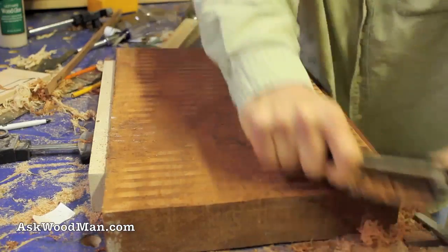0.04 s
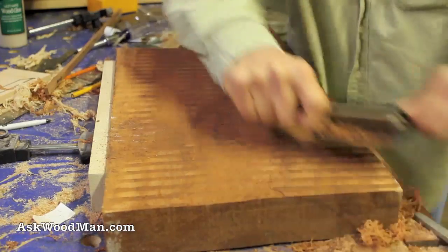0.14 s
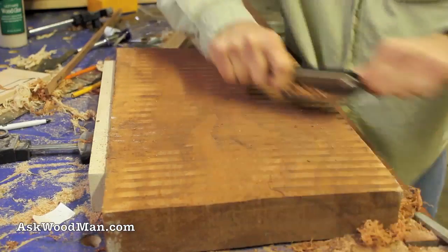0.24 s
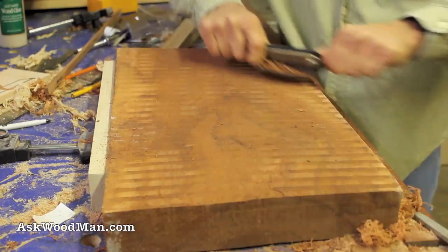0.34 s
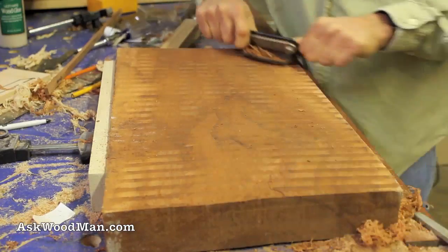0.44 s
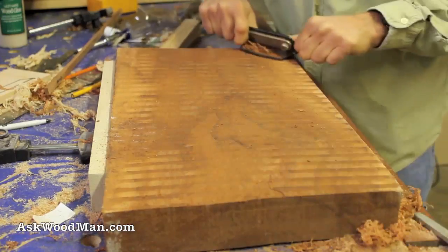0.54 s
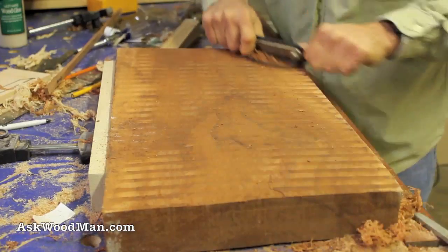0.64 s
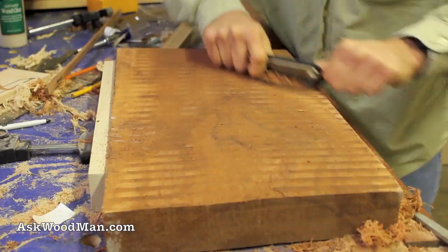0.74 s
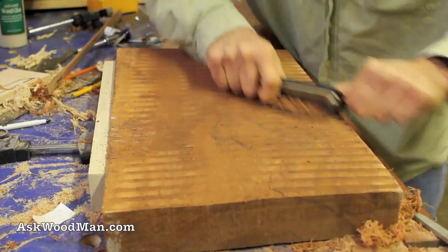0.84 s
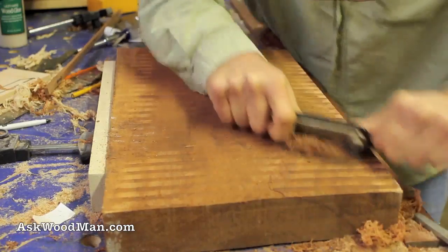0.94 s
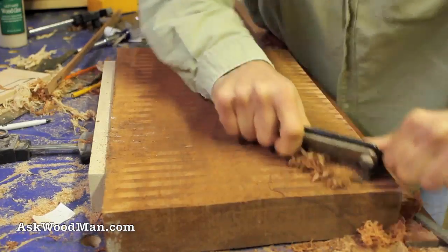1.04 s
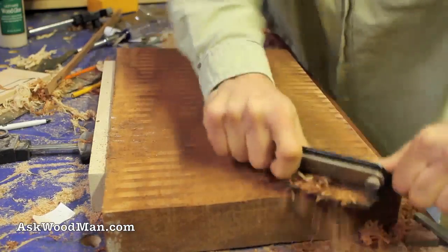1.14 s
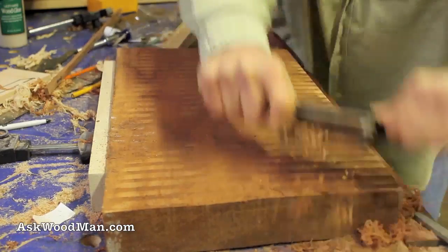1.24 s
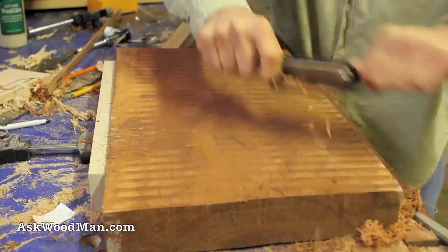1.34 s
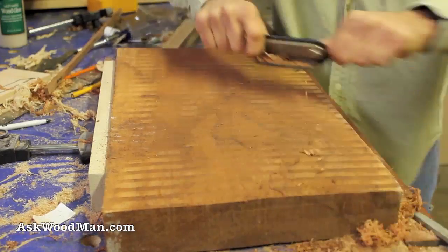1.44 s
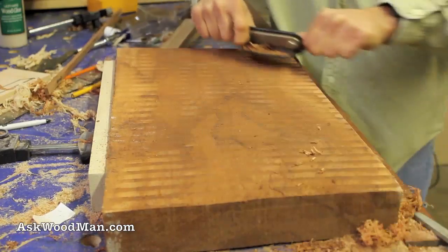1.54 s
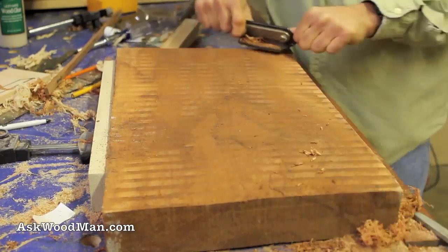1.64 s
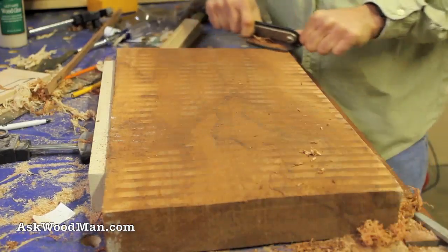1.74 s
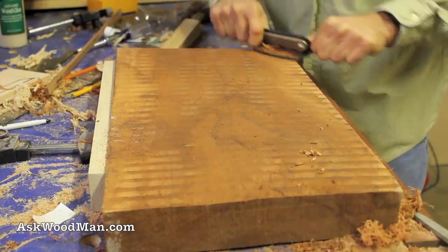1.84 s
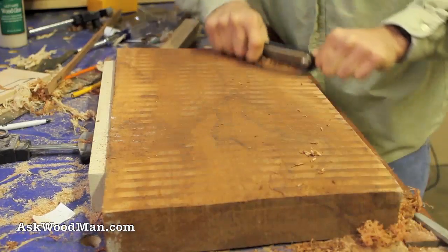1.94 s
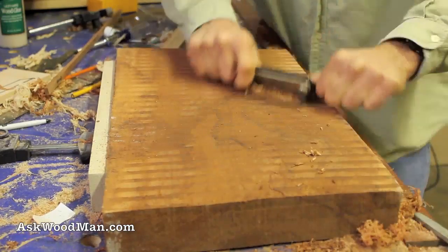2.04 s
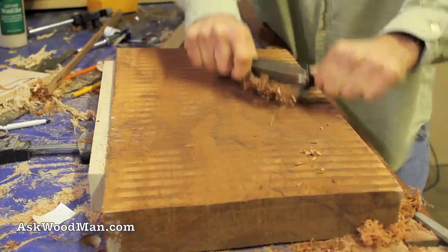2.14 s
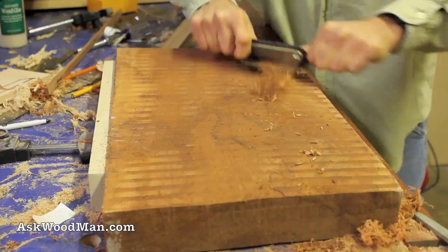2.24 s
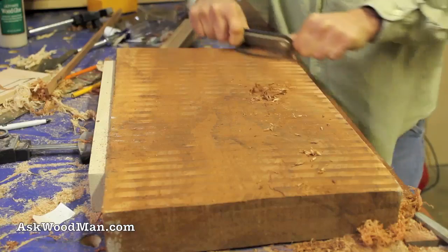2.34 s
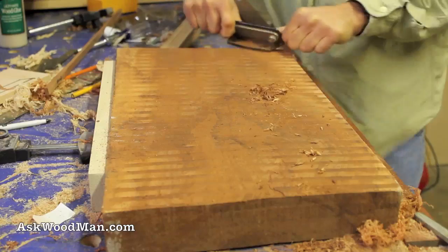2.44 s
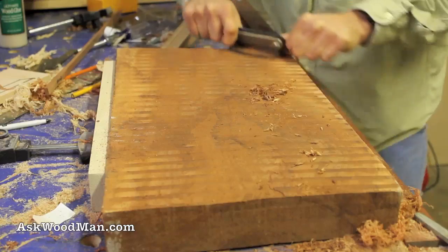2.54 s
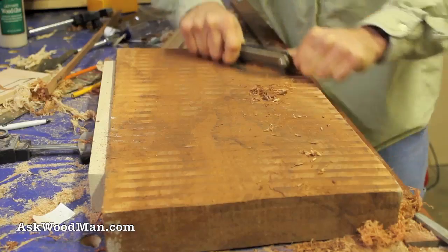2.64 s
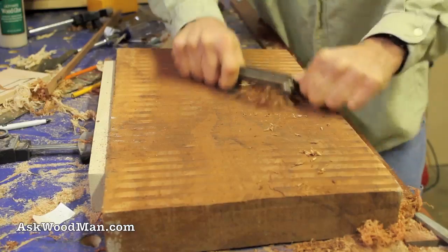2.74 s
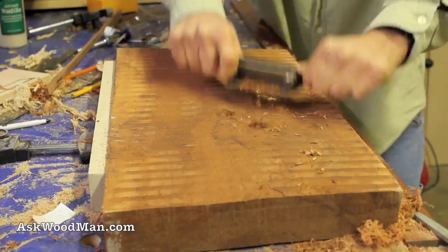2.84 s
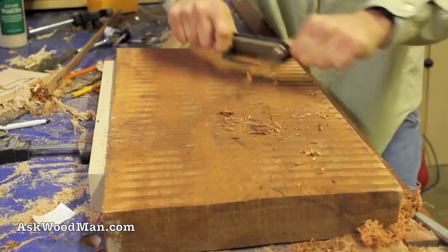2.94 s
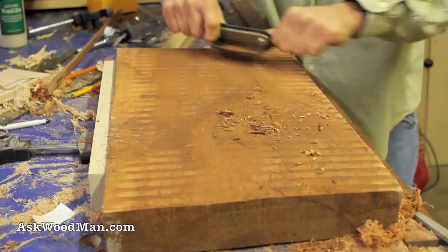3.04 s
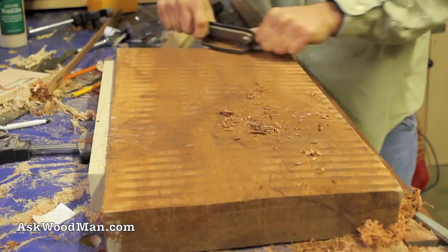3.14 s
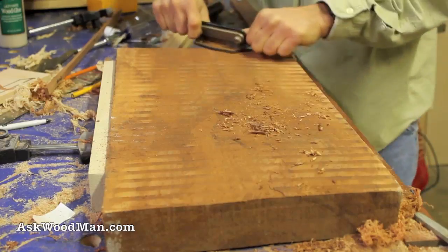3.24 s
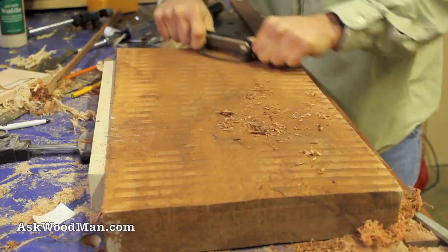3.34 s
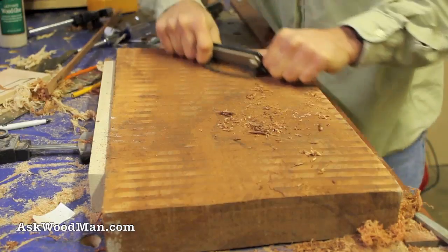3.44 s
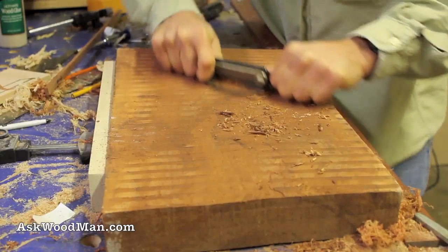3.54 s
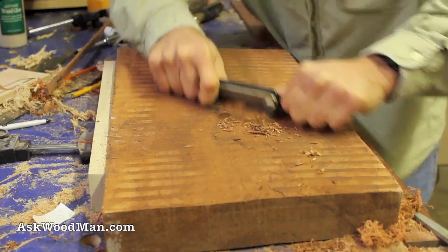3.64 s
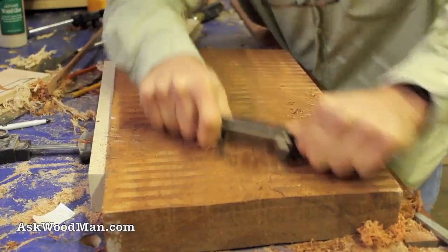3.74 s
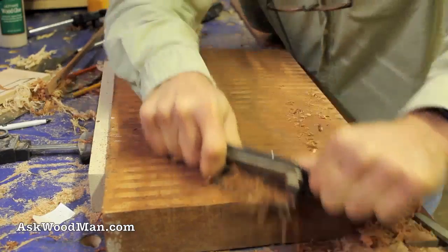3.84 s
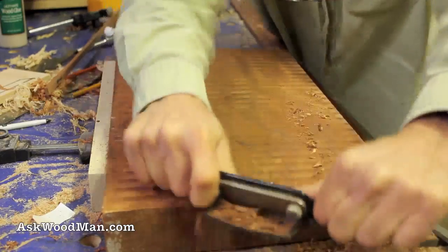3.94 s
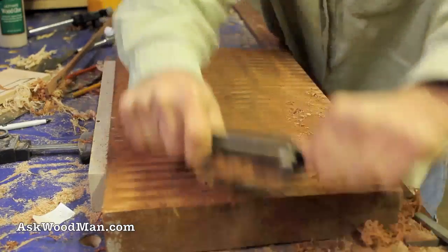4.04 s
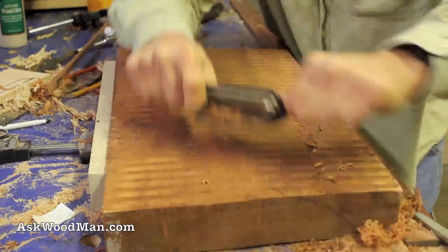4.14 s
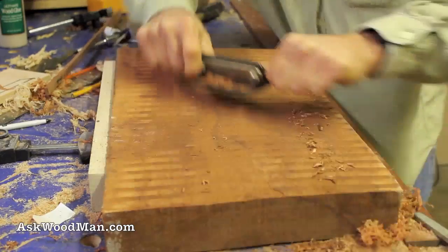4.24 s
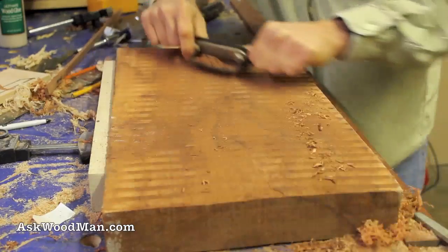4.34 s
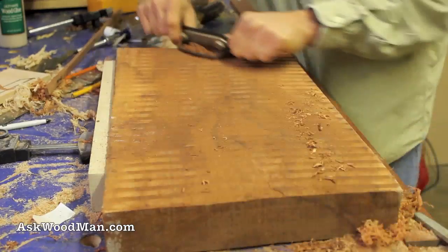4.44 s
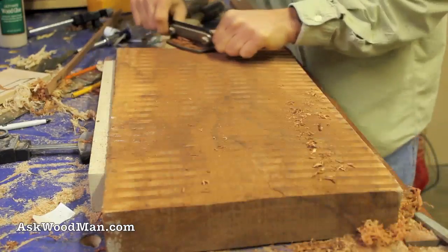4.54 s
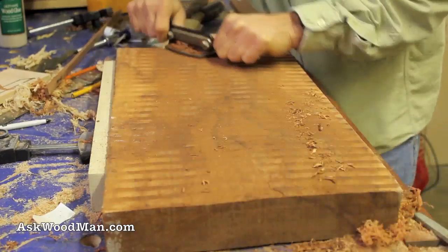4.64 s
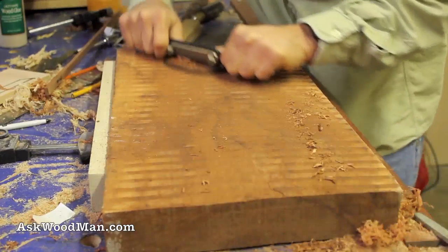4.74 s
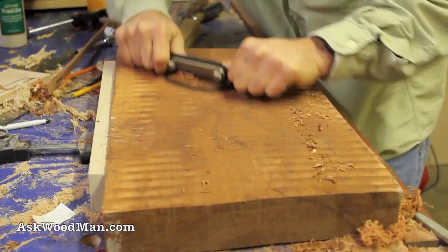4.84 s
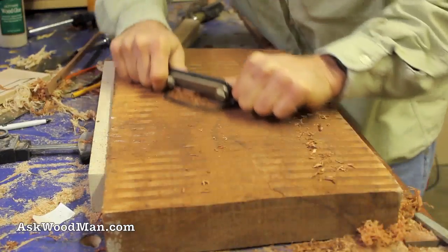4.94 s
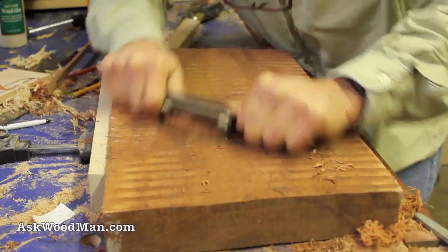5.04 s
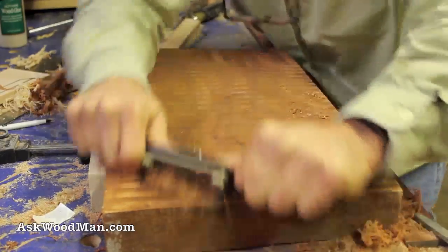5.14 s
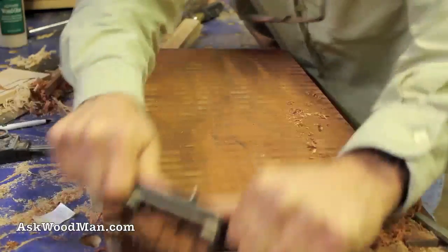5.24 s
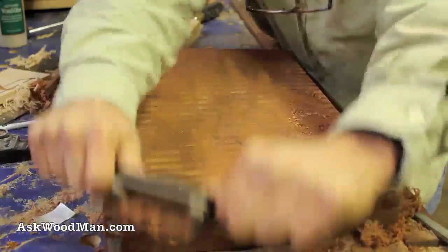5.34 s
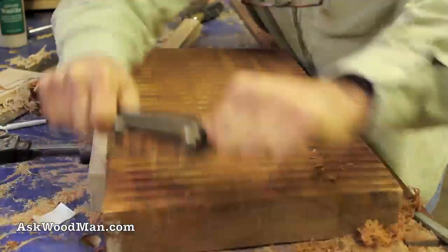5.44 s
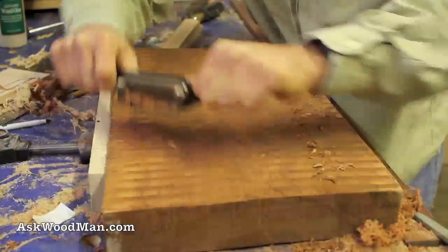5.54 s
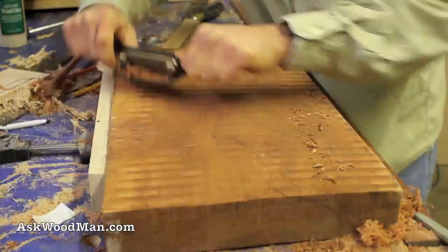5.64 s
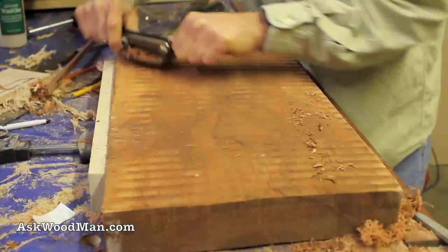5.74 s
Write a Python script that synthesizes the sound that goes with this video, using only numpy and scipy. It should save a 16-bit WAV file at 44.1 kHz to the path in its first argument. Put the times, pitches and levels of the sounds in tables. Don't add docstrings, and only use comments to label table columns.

```python
import sys
import numpy as np
from scipy import signal
from scipy.fft import rfft, irfft, next_fast_len
from scipy.io import wavfile
from scipy.ndimage import uniform_filter1d, map_coordinates

SR = 44100
rng = np.random.default_rng(int(sys.argv[2]) if len(sys.argv) > 2 else 0)


def boost(x):
    u = np.asarray(x, float) / 20
    return 10 ** u


def to_wav(s):
    ch = np.atleast_2d(s).T
    pcm = np.round(np.clip(ch, -1, 1) * 32767)
    wavfile.write(sys.argv[1], SR, pcm.astype(np.int16))


N = 255691
LEAD = SR // 2
KNEE_DB = -19

# blade [dB], edge hiss and dust hiss [dB re blade], slab [dB].
BEFORE_DB = (-20, -6, -15, -27.5)
# time [s], cutting force [dB], chatter [Hz].
PULL_1 = [
    [(.565, -47, 3230), (.608, -33.5, 3150), (.638, -15.5, 3110), (.752, -13, 3300), (.78, -17, 3500),
     (.888, -12, 3500), (.979, -20, 3100), (1.015, -34, 3110), (1.047, -26, 3130)],
    [(1.048, -27, 3174), (1.06, -19.5, 3160), (1.09, -14, 3270), (1.129, -15, 3400)],
]
PULL_2 = [
    [(1.803, -29, 3104), (1.812, -26.5, 3150), (1.843, -21, 3300), (1.861, -12.5, 3250), (1.929, -17, 3250),
     (1.971, -13.5, 3500), (2.069, -16.5, 3480), (2.075, -28, 3630)],
]
PULL_3 = [
    [(2.503, -44, 3460), (2.516, -27.5, 3440), (2.543, -14, 3300), (2.565, -12.5, 3224), (2.713, -19, 3280),
     (2.757, -12.5, 3394), (2.775, -30, 3280)],
]
PULL_4 = [
    [(3.289, -29, 3410), (3.31, -19.5, 3213), (3.34, -13, 3132), (3.472, -22.5, 2992)],
    [(3.473, -14, 3380), (3.49, -15.5, 3203), (3.623, -15, 3400), (3.657, -20.5, 3156),
     (3.719, -13.5, 3330), (3.819, -25, 3160), (3.877, -16.5, 3200), (3.922, -24.5, 3334)],
]
PULL_5 = [
    [(4.532, -47.5, 3252), (4.605, -37.5, 3213), (4.647, -25, 3100), (4.682, -12.5, 3413),
     (4.748, -15.5, 3140), (4.802, -19, 3430), (4.862, -16.5, 3126), (5.0, -18.5, 3050), (5.038, -14, 3263)],
    [(5.05, -39, 3260), (5.09, -34, 3197), (5.101, -40, 3107), (5.107, -15.5, 3154), (5.167, -22, 3464),
     (5.251, -21.5, 3600), (5.262, -27, 3634)],
]
PULLS = [PULL_1, PULL_2, PULL_3, PULL_4, PULL_5]
# edge hiss and dust hiss [dB re force], slab boom [dB],
# slab ring [dB], dust fading [dB per s].
WOOD = [
    (-3.5, -11, -65, -48.5, -10),
    (-2, -8, -39.5, -36, -20),
    (-1.5, -8, -38.5, -37, -6),
    (-4, -9.5, -33, -35.5, -11),
    (-3.5, -9, -40.5, -35, 1),
]
# time [s], peak [dB], pitch [Hz].
CATCHES = [(0.6492, -17, 3350), (0.67, -11, 3380), (0.699, -10, 3320), (0.7158, -13, 3290),
           (0.7441, -6, 3400), (0.753, -9, 3620), (0.7761, -11, 3400), (0.8646, -13, 3470),
           (0.8844, -8, 3580), (0.912, -11, 3480), (0.9227, -7, 3270), (0.9684, -11.5, 3150),
           (1.0042, -19, 3070), (1.065, -9.5, 3250), (1.0954, -4, 3100), (1.1162, -4, 3450),
           (1.1253, -14, 3550), (1.8534, -8, 3360), (1.8766, -5, 3250), (1.891, -9, 3350),
           (1.908, -6.5, 3290), (1.9829, -12, 3440), (2.004, -6, 3720), (2.039, -12, 3350),
           (2.064, -14, 3430), (2.5614, -9, 3400), (2.5981, -15, 3340), (2.6297, -10, 3110),
           (2.7444, -18, 3440), (2.7595, -10, 3290), (3.3116, -14, 3240), (3.3234, -10, 3160),
           (3.3473, -8, 3100), (3.363, -4, 3380), (3.3721, -6, 3110), (3.402, -8, 3130), (3.4886, -9, 3240),
           (3.5114, -12, 3070), (3.565, -10, 3230), (3.6031, -7, 3060), (3.626, -10, 3420),
           (3.697, -7, 3540), (3.7106, -8.5, 3800), (3.7228, -8, 3490), (3.7439, -7.5, 3010),
           (4.6548, -16, 3210), (4.6773, -7, 3580), (4.687, -8, 3310), (4.7058, -8, 3500),
           (4.7272, -9, 2800), (4.7534, -10, 3230), (4.7686, -11, 3300), (4.8311, -9, 3660),
           (4.8686, -8, 3420), (4.9835, -12, 2880), (5.0082, -12, 3370), (5.0341, -9, 3290),
           (5.109, -4.5, 3090), (5.1329, -9, 3600), (5.2337, -12.5, 3680)]


def unit(x):
    return x / np.sqrt(np.mean(x ** 2) + 1e-20)


def along(points, hz):
    f, v = np.transpose(points)
    return np.interp(np.log(hz + 1), np.log(f + 1), v)


def curves(spans, silent):
    t = np.arange(N) / SR
    s, *cols = np.transpose(np.vstack(spans))
    on = sum((t >= rows[0][0] - .001) & (t <= rows[-1][0] + .001) for rows in spans) > 0
    return [np.where(on | (k >= silent), np.interp(t, s, c), -120) for k, c in enumerate(cols)]


def swells(rows):
    s, half, *cols = np.transpose(rows)
    bells = np.exp(-((np.arange(N) / SR - s[:, None]) / half[:, None]) ** 2)
    return [boost(c) @ bells for c in cols]


def per_pull(values):
    starts = [pull[0][0][0] for pull in PULLS[1:]]
    return np.asarray(values)[np.searchsorted(starts, np.arange(N) / SR)]


def pull_times():
    return per_pull([(pull[0][0][0], pull[-1][-1][0]) for pull in PULLS]).T


def earlier(curve, value):
    return np.r_[np.full(LEAD - 900, value), np.full(900, -120), curve]


def wobble(rate, size):
    return map_coordinates(rng.standard_normal(int(size * rate / SR) + 4), [np.arange(size) * rate / SR])


def filtered(x, response):
    m = 2 * next_fast_len(len(x) // 2 + 4096)
    return irfft(rfft(x, m) * response(np.fft.rfftfreq(m, 1 / SR)), m)[:len(x)]


def coloured(x, spectrum):
    return unit(filtered(x, lambda hz: boost(along(spectrum, hz))))


def struck(x, spectrum):
    def response(hz):
        cepstrum = irfft(np.log(boost(along(spectrum, hz)) + 1e-4))
        half = len(cepstrum) // 2
        cepstrum[1:half] *= 2
        cepstrum[half + 1:] = 0
        return np.exp(rfft(cepstrum, len(cepstrum)))
    return unit(filtered(x, response))


def patchy(x, depth_db):
    z = signal.stft(x, nperseg=256)[2]
    field = uniform_filter1d(rng.standard_normal(z.shape), size=4, axis=0)
    field = uniform_filter1d(field, size=12, axis=1)
    return signal.istft(z * boost(depth_db * unit(field)), nperseg=256)[1][:len(x)]


def resonant(x, modes, shift_db, rate, lean=0):
    out = 0
    for hz, width_hz, db in modes:
        def twice(f):
            damping = 1j * f * width_hz * 1.5
            return (damping / (hz * hz - f * f + damping)) ** 2
        gain_db = db + shift_db * wobble(rate, len(x)) + lean * (hz - 3250) / 1000
        out = out + boost(gain_db) * unit(filtered(x, twice))
    return out / np.sqrt(np.abs(uniform_filter1d(out ** 2, size=5000)) + 1e-9)


def dying(decays, stretch, size):
    hz, t, z = signal.stft(rng.standard_normal(size), SR, nperseg=256)
    fade_db = -60 * t / (stretch * along(decays, hz))[:, None]
    tail = signal.istft(z * boost(fade_db), SR, nperseg=256)[1][:size]
    return tail / np.linalg.norm(tail)


def ring(modes, t, stretch):
    out = 0
    for hz, db, t60_s in modes:
        decay = boost(db + rng.normal(0, .5) - 60 * t / (stretch * t60_s))
        out = out + decay * np.sin(2 * np.pi * hz * (1 + rng.normal(0, .003)) * t)
    return out


def fibres(size, lump_db, spike_db):
    return rng.standard_normal(size) * boost(lump_db * wobble(300, size) + spike_db * wobble(2500, size))


def tones(lines, unsteady_db):
    t = np.arange(N) / SR
    out = 0
    for hz, db in lines:
        level = boost(db + 4.5 + unsteady_db * wobble(5.37, N))
        out = out + level * np.sin(2 * np.pi * (hz * t + rng.random()))
    return out


def gain_control():
    low_db, start_db, back_db_per_s = -70.5, -75.5, 12.5
    t = np.arange(N) / SR
    start, end = pull_times()
    before_db = start_db + 2 * back_db_per_s * t
    after_db = low_db + back_db_per_s * np.maximum(t - end, 0)
    return uniform_filter1d(np.where(t < start, before_db, after_db), size=4000)


def air_and_lamps(gain_db):
    # frequency [Hz], density [dB per Hz].
    air_spectrum = [(15, -44), (25, -11), (190, -1.5), (236, -2), (285, -16), (354, 0), (1100, -10),
                    (1190, -16), (1400, -3), (2350, -8.5), (2690, -8.5), (14400, -19), (16000, -14.5)]
    # frequency [Hz], level [dB rms].
    lamp_lines = [(120, -71.5), (240, -63), (360, -63), (480, -66.5), (720, -71.5), (960, -73), (1080, -77),
                  (1200, -63.5), (1920, -72), (2040, -69.5), (2160, -73), (2280, -65.5), (2400, -73)]
    hush = boost(-53.0) * coloured(rng.standard_normal(N), air_spectrum)
    return boost(0.42 * (gain_db + 59.5)) * (hush + tones(lamp_lines, unsteady_db=5.5))


def whine(gain_db):
    # frequency [Hz], level [dB re whine].
    whine_lines = [(15674, -2), (15694, -15), (15734, 8.5), (15778, -14)]
    beat_hz, beat_depth = 13, .6
    beat = 1 - beat_depth * np.cos(2 * np.pi * beat_hz * np.arange(N) / SR)
    return beat * boost(gain_db + .8 * wobble(25, N)) * tones(whine_lines, unsteady_db=.8)


def rustle():
    # time [s], half length [s], crisp [dB], soft [dB], bench [dB].
    moves = [(.1, 0.053, -78, -46.5, -57), (.47, 0.21, -46, -49, -57), (1.72, 0.1, -52, -54, -73),
             (2.2, 0.02, -46, -37, -51), (2.34, 0.24, -44, -44.5, -46.5), (2.93, 0.12, -52, -51, -67),
             (4.02, 0.027, -68, -52, -53), (4.17, 0.16, -49, -51, -57), (4.38, 0.19, -46.5, -51, -55),
             (5.78, 0.16, -48, -51.5, -57)]
    # crisp, soft, bench [dB].
    rest_db = (-81, -70, -59.5)
    # time [s], peak [dB].
    specks = [(1.2529, -28), (3.023, -56), (3.0886, -48), (4.3929, -60), (5.5073, -48), (5.5623, -50)]
    # time [s], level [dB].
    jolts = [(0, -60), (.66, -64), (1.07, -57), (1.86, -53), (2.2, -60), (3.18, -59), (3.9, -60),
             (4.52, -49), (5.1, -58)]
    # frequency [Hz], density [dB per Hz].
    crisp_spectrum = [(3530, -43.5), (6000, -12), (7910, -5.5), (10300, -0.5), (14500, -5.5), (15000, -10),
                      (15200, -4), (15600, -3)]
    soft_spectrum = [(710, -38), (1200, -10), (1830, 1.5), (2070, 4), (3400, -5), (3910, 2.5), (7000, -10),
                     (9100, -47), (15400, -120)]
    bench_spectrum = [(24, -63), (40, -47), (177, -2.5), (350, -2), (388, -10), (519, 4.5), (601, -7.5),
                      (1300, -8), (1690, -45), (2860, -120)]
    sway_spectrum = [(20, -42), (35, -23), (60, 0.5), (85, -4), (110, -29.5)]
    jolt_s, sway_db = 0.11, -69

    crisp_db, soft_db, bench_db = 20 * np.log10(swells(moves) + boost(rest_db)[:, None])
    chips = np.ones(N)
    for s, db in specks:
        chips[round(s * SR):][:130] = boost(db + 65)
    crisp_noise = patchy(rng.standard_normal(N), depth_db=1.4) * chips
    crisp = boost(crisp_db - 1.5) * coloured(crisp_noise, crisp_spectrum)
    soft_noise = patchy(rng.standard_normal(N), depth_db=1.4)
    soft = boost(soft_db - 2.5) * coloured(soft_noise, soft_spectrum)
    bench_level = boost(bench_db - 2.5 + 1.5 * wobble(20, N))
    bench = bench_level * coloured(rng.standard_normal(N), bench_spectrum)
    rocking, = swells([(s, jolt_s, db) for s, db in jolts])
    sway = coloured(rng.standard_normal(N), sway_spectrum)
    return crisp + soft + bench + (boost(sway_db) + rocking) * sway


def knocks():
    # time [s], peak [dB], crack, thud and clack [dB re
    landings = [
        (0.504, -11.5, -19.5, 0, -25),
        (0.584, -30, 3.5, -22, -10),
        (0.642, -32, 3, -18, -13),
        (1.701, 0.5, -20.5, -14, -17),
        (2.33, -1.5, -25.5, -14.5, -9),
        (3.177, 0, -4.5, -17, -7),
        (4.421, 1.5, -22.5, -19, -6.5),
        (4.535, -11.5, -22, -3.5, -15),
    ]
    places = (0, 0, 0, 1, 2, 3, 4, 4)
    push_db = (1, 1.4, 1.1, 0.95, -0.62)
    # frequency [Hz], t60 [s], level at each of five places [dB].
    slab_modes = [(125.6, 0.27, -18, -14, -13, -14, -10.5), (265, 0.16, -4, -17, -14, -7, -7),
                  (308, 0.093, 11, 5, 2, -9, -5), (420.3, 0.16, 5.5, -2.5, -0.5, -8, 2.5),
                  (544, 0.15, -8, -8, -3, 0.5, -14), (683, 0.31, -8, -3, -4, -1, -3.5),
                  (750, 0.34, -7, -4, -4, -3, -3.5), (861, .06, 11, 8, 6, 8, 2.5),
                  (1058, 0.22, -19, -11.5, -3, -4, -2), (1105, 0.099, -15, -20, -13, 3, 0.5),
                  (1240, 0.15, -20, -15, -11, -10, -5), (1337, 0.16, -19, -18, -12, -11, -10),
                  (1645, 0.2, -30, -28, -24, -18, -14), (1870, .17, -30, -12, -10, -8, -29)]
    # frequency [Hz], level [dB], t60 [s].
    body_modes = [(2040, -9, .12), (2300, -16, .12), (2580, -14, .12), (3540, -10, .05), (4260, -15, .08),
                  (4600, -16, .1), (7800, -27, .06)]
    # frequency [Hz], t60 [s].
    scatter_decay = [(100, 0.39), (400, 0.23), (1000, 0.4), (1600, 0.18), (2500, 0.28), (6000, 0.25),
                     (14000, 0.21)]
    # frequency [Hz], density [dB per Hz].
    thump_spectrum = [(150, -27), (250, -18), (301, 6), (775, 0), (954, -4), (1070, 3), (1440, -25.5),
                      (1700, -13), (2210, -26), (3740, -120)]
    crack_spectrum = [(1500, -52), (2100, 2.5), (2550, 10.5), (3400, 5), (5600, -2.5), (6500, -16),
                      (9000, -24), (15500, -36)]
    thud_spectrum = [(60, -40), (90, -12), (150, 10.5), (280, 20), (330, -58.5)]
    stretch = 1.43

    out, t = np.zeros(N + SR), np.arange(SR // 2) / SR
    late = t - .002
    swell = np.clip(late / 0.0012, 0, 1)

    def scatter(spectrum):
        return struck(dying(scatter_decay, stretch, len(t)), spectrum) * swell

    for (s, db, crack_db, thud_db, clack_db), place in zip(landings, places):
        wood = [(hz, levels[place], t60_s) for hz, t60_s, *levels in slab_modes]
        push = -np.cos(2 * np.pi * 710 * late + 1.32) * np.exp(-(late / 0.00091) ** 2)
        low = boost(push_db[place]) * push + boost(-30) * scatter(thump_spectrum)
        low = low + boost(-19.5) * ring(wood, t, stretch) * swell
        thud = scatter(thud_spectrum)
        clack_hz = 2100 - 91 * s
        clack = scatter([(clack_hz * .6, -50), (clack_hz * .85, -6), (clack_hz, 0),
                         (clack_hz * 1.12, -8), (clack_hz * 1.5, -50)])
        tick = rng.standard_normal(len(t)) * np.exp(-((late + .0005) / .0004) ** 2)
        hard = boost(-27 + .1 * (crack_db + 8))
        crack = hard * struck(tick, crack_spectrum) + boost(-31) * scatter(crack_spectrum)
        crack = crack - boost(-21) * np.exp(-(late / .0015) ** 2)
        crack = crack + boost(-12.5 - .35 * (crack_db + 4)) * ring(body_modes, t, stretch) * swell
        blow = low + boost(thud_db - 28.0) * thud + boost(clack_db - 33.0) * clack + boost(crack_db) * crack
        out[round((s - .0005) * SR):][:len(t)] += boost(db - 2) * blow
    return out[:N]


def cutting():
    # time [s], half length [s], level [dB].
    skips = [(0.9, 0.011, -7), (2.01, 0.015, -2.5), (3.78, 0.0066, -5)]
    # time [s], half length [s], edge hiss and dust hiss lift [dB].
    curls = [(.66, .04, 2, 0.8), (.76, .05, -0.5, 0.5), (.86, .04, 2, 1), (.96, .04, -0.5, -1),
             (1.09, .04, 1, 3), (1.817, .015, 1, 1.5), (1.84, 0.015, -2.5, 3), (1.96, .04, 0.5, 3),
             (2.04, .03, 0.1, 1), (2.552, .03, -0.5, 2), (2.62, 0.033, -1, 0.5), (2.704, .04, 0, 1.5),
             (3.305, .02, 1, 0), (3.42, .05, 0, -1.5), (3.61, .07, 2.5, 2), (3.69, 0.018, -2, -8),
             (3.74, 0.023, 3, -2.5), (3.825, .02, -2.5, -3.5), (3.89, .025, 0.5, 6), (4.68, .04, -0.6, 1),
             (4.76, .04, 0.1, 3.5), (4.86, 0.057, -2, 1.5), (4.94, .04, 1, 0.5), (5, 0.023, 3, 1),
             (5.143, 0.019, 1.5, 0), (5.202, 0.041, 0, 3.5)]
    edge_lag, dust_lag = 0.77, 1
    blade_db, chatter_hz = curves(sum(PULLS, []), silent=1)
    excess_db = np.maximum(blade_db - KNEE_DB, 0)
    edge_db, dust_db = per_pull(WOOD)[:, :2].T - np.outer([edge_lag, dust_lag], excess_db)
    t = np.arange(N) / SR
    start, end = pull_times()
    dust_db = dust_db + per_pull(WOOD)[:, -1] * np.clip(t - (start + end) / 2, -.5, .5)
    for s, half_s, edge_lift_db, dust_lift_db in curls:
        bell = np.exp(-((t - s) / half_s) ** 2)
        edge_db = edge_db + edge_lift_db * bell
        dust_db = dust_db + dust_lift_db * bell
    for s, half_s, db in skips:
        blade_db = blade_db + db * np.exp(-((t - s) / half_s) ** 4)
    return blade_db, edge_db, dust_db, chatter_hz


def catching():
    marks = np.bincount([LEAD + round(row[0] * SR) for row in CATCHES], minlength=LEAD + N)
    return np.convolve(marks, np.exp(-(np.arange(-300, 301) / SR / .0025) ** 2), "same")


def plane():
    # frequency [Hz], width [Hz], level [dB].
    blade_modes = [(2602, 200, 4.5), (2950, 183, 4), (3330, 394, 6.5), (3697, 540, 0), (4150, 280, -13)]
    # frequency [Hz], density [dB per Hz].
    edge_spectrum = [(3600, -61), (4200, -1), (4800, 3.5), (5500, 0), (6250, 2), (7000, -0.5), (7950, -1),
                     (8500, -9), (9500, -21), (20000, -120)]
    dust_spectrum = [(6500, -49), (8300, -15), (8900, -4.5), (9700, 2), (10600, -2.5), (11300, 4.5),
                     (11900, 0), (14400, 2.5), (15500, -2.5), (16000, -27)]
    size = LEAD + N
    blade_db, edge_db, dust_db, chatter_hz = cutting()
    force = uniform_filter1d(boost(earlier(blade_db, BEFORE_DB[0])), size=60)
    force = force * unit(boost(.4 * wobble(60, size) + .6 * wobble(170, size)))
    tears = fibres(size, lump_db=0.37, spike_db=1.0)

    chatter_hz = np.r_[np.full(LEAD, 3180.), chatter_hz]
    lean = 22 * (chatter_hz - 3280) / 1000
    chatter_hz = chatter_hz * (1 + .04 * wobble(45, size) + .035 * wobble(500, size))
    phase = 2 * np.pi * np.cumsum(chatter_hz) / SR
    grip = unit((.5 + wobble(600, size)) * boost(.6 * wobble(90, size)))

    blade = boost(-1.5) * resonant(tears, blade_modes, shift_db=2.3, rate=28, lean=lean)
    blade = blade + boost(-7) * grip * np.sin(phase)
    blade = filtered(blade, lambda hz: 1 / (1 + (2350 / (hz + 1)) ** 14))
    caught = catching()
    blade = blade * (1 - .5 * caught)
    tears = tears * (1 + .4 * caught)
    edge = coloured(patchy(tears, depth_db=1.9), edge_spectrum) + boost(-10) * grip * np.sin(2 * phase)
    dust = coloured(patchy(tears, depth_db=2.2), dust_spectrum)
    edge = boost(earlier(edge_db, BEFORE_DB[1])) * edge
    dust = boost(earlier(dust_db, BEFORE_DB[2])) * dust
    return force * (blade + edge + dust)


def dragging():
    # time [s], half length [s], boom [dB], ring [dB].
    ridges = [(.656, 0.045, -28.5, -30), (.804, 0.073, -36, -32.5), (.97, 0.077, -40, -35.5),
              (1.07, 0.049, -28.5, -31), (1.825, 0.03, -30, -27.5), (1.862, 0.016, -36, -26.5),
              (2.55, 0.065, -41, -31.5), (2.67, 0.067, -43, -44), (3.3, 0.028, -38, -43),
              (3.642, 0.045, -43, -43), (3.72, 0.022, -64, -36), (3.896, 0.049, -44, -42.5),
              (4.672, 0.042, -33, -40), (4.78, 0.021, -39, -66), (4.88, 0.12, -37, -68),
              (5.12, 0.16, -43.5, -41)]
    sag_db_per_s, after_s, loose = -5, 0.047, 0.35
    t = np.arange(N) / SR
    start, end = pull_times()
    on = (t >= start) & (t < end + after_s)
    force_db = curves(sum(PULLS, []), silent=0)[0]
    rub_db = sag_db_per_s * (t - (start + end) / 2) + loose * np.minimum(force_db - KNEE_DB, 0)
    levels = on * (boost(per_pull(WOOD)[:, 2:4].T + rub_db) + swells(ridges))
    return 20 * np.log10(levels + 1e-6)


def slab():
    # frequency [Hz], width [Hz], level [dB].
    boom_modes = [(148, 40, -25), (212, 87, -14), (294.5, 106, 3.5), (375, 82, -3)]
    mid_modes = [(550, 63, 2), (706, 120, 3.5), (879, 69, 2), (1102, 217, 4.5), (1353, 49, -3.5),
                 (1513, 164, -0.5), (1982, 286, 4)]
    size = LEAD + N
    boom_db, mids_db = dragging()
    bumps = fibres(size, lump_db=0.5, spike_db=-3.0) * boost(0.84 * wobble(30, size))
    boom_level = uniform_filter1d(boost(earlier(boom_db, BEFORE_DB[3])), size=400)
    mids_level = uniform_filter1d(boost(earlier(mids_db, BEFORE_DB[3] - 3)), size=400)
    mids = mids_level * resonant(bumps, mid_modes, shift_db=1.8, rate=20)
    return boom_level * resonant(bumps, boom_modes, shift_db=2.5, rate=14) + mids


def touches():
    # time [s], half length [s], level [dB].
    brushes = [
        (.59, 0.025, -43),
        (3.33, 0.038, -30),
        (4.56, 0.024, -43),
        (4.63, 0.021, -29.5),
    ]
    # frequency [Hz], width [Hz], level [dB].
    singing_modes = [(3250, 250, 0), (5460, 150, -10), (6080, 130, -4), (9560, 200, -14), (11300, 300, -9)]
    level, = swells(brushes)
    return level * resonant(fibres(N, lump_db=-1.5, spike_db=4.0), singing_modes, shift_db=4, rate=25)


def catches():
    half_s, level_db, octave_db = 0.0033, -3.5, -27
    out, t = np.zeros(LEAD + N), np.arange(-300, 300) / SR
    bell = np.exp(-(t / half_s) ** 2 * np.where(t < 0, 3, 1))
    for s, db, hz in CATCHES:
        turn, glide = rng.random(2)
        phase = 2 * np.pi * (hz * t * (1 + 12 * (glide - .5) * t) + turn)
        burst = (np.sin(phase) + boost(octave_db) * np.sin(2 * phase)) * bell
        out[LEAD + round(s * SR) - 300:][:len(t)] += boost(db + level_db) * burst
    return out


def squeals():
    # time [s], length [s], level [dB], first pitch [Hz], last pitch [Hz].
    glides = [(.91, 0.02, -19, 6300, 6100), (1.85, 0.054, -21.5, 1550, 1500), (.965, 0.067, -28, 400, 290),
              (1.04, 0.053, -21, 280, 263), (1.088, .03, -24.5, 270, 310), (1.05, 0.078, -29, 1150, 1130),
              (1.115, 0.0153, -25, 3500, 4700), (5.104, 0.021, -13, 3300, 3250),
              (5.118, 0.0326, -11.5, 4300, 2900), (5.11, .035, -20, 6400, 7700),
              (5.228, 0.022, -16, 3800, 4800), (3.298, 0.0341, -16.5, 3100, 3200),
              (4.63, .12, -38, 129, 122), (3.725, .02, -18, 5500, 6500), (4.615, 0.14, -33.5, 1920, 1930),
              (4.625, 0.038, -25, 2520, 2500)]
    out = np.zeros(LEAD + N)
    for s, length_s, db, first_hz, last_hz in glides:
        size = round(length_s * SR)
        tone = np.sin(2 * np.pi * np.cumsum(np.linspace(first_hz, last_hz, size)) / SR)
        rough = .7 + .8 * wobble(first_hz / 4, size)
        out[LEAD + round(s * SR):][:size] += boost(db) * tone * np.hanning(size) ** .5 * rough
    return out


def shop(x):
    # frequency [Hz], t60 [s].
    room_decay = [(100, 0.55), (400, 0.48), (1200, 0.74), (3000, 0.52), (6000, 0.48), (10000, 0.36),
                  (15000, 0.39)]
    out, size = np.zeros(len(x) + 2 * SR), 8192
    for start in range(0, len(x), size):
        wet = signal.fftconvolve(x[start:start + size], dying(room_decay, 1, SR // 2))
        out[start + 300:][:len(wet)] += wet
    return out[:len(x)]


def scene():
    gain_db = gain_control()
    background = air_and_lamps(gain_db) + whine(gain_db)
    cut = plane() + squeals() + catches() + slab()
    cut_in_room = (cut + boost(-9.5) * shop(cut))[LEAD:]
    mono = background + rustle() + knocks() + cut_in_room + touches()
    return np.array([mono, mono])


def low_pass(x):
    return signal.sosfilt(signal.butter(12, 16470, fs=SR, output="sos"), x)


def record(dry):
    clipped = dry / (1 + np.abs(dry / .98) ** 8) ** (1 / 8)
    mix = np.array([filtered(side, lambda hz: hz < 15830) for side in clipped])
    return low_pass(mix)


dry = scene()
out = record(dry)
to_wav(out)
```